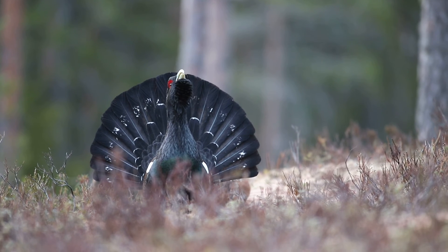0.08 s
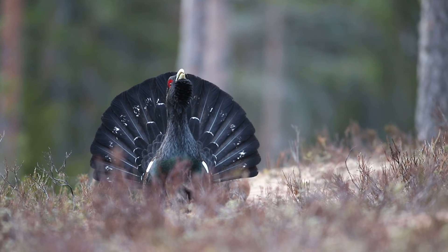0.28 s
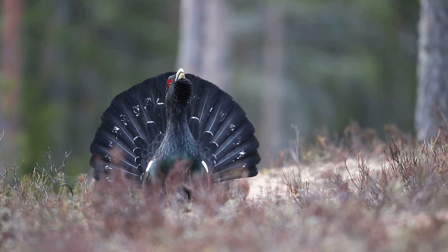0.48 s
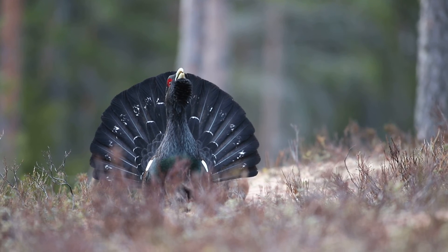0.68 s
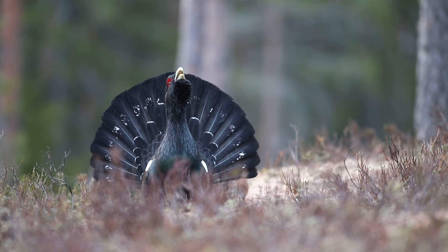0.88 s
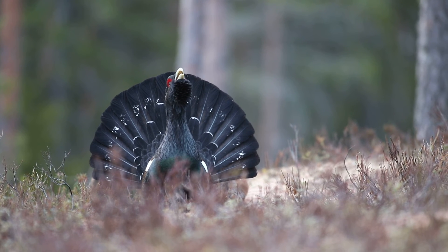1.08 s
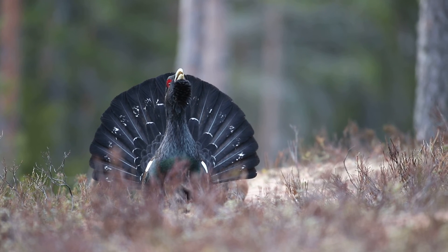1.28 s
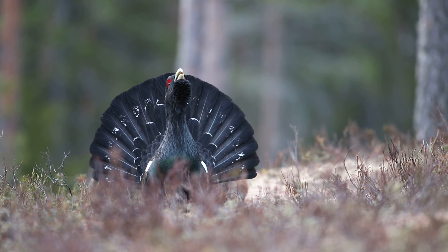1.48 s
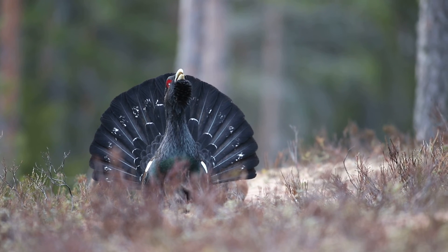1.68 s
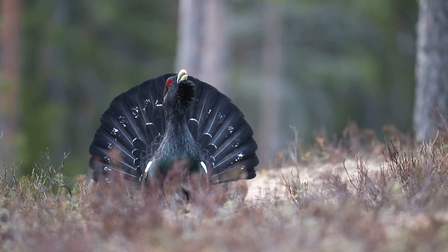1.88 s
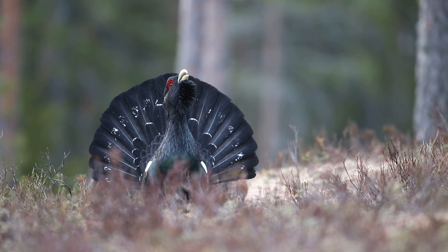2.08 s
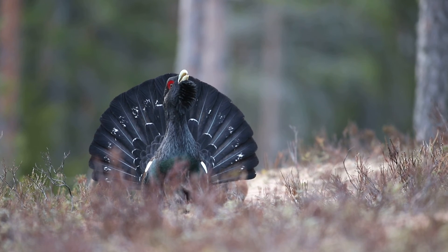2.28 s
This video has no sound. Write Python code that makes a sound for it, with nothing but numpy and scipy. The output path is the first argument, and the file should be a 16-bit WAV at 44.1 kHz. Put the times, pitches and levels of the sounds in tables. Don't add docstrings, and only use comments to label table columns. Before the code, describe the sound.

Near stereo view of a grouse in quiet pine woods: a low thump swells and fades, then two crisp hollow clicks snap, while distant birds whistle thinly with blurred echoes above soft air and rumble.

```python
import sys
import numpy as np
from scipy import signal
from scipy.fft import rfft, irfft, next_fast_len
from scipy.io import wavfile
from scipy.ndimage import uniform_filter1d, map_coordinates

SR = 44100
rng = np.random.default_rng(int(sys.argv[2]) if len(sys.argv) > 2 else 0)


def digitize_waveform(pressure):
    field = np.atleast_2d(pressure).T
    bounded = np.clip(field, -1, 1)
    quanta = np.round(bounded * 32767).astype(np.int16)
    wavfile.write(sys.argv[1], SR, quanta)


def invert_db(level):
    return 10 ** (np.asarray(level, dtype=float) / 20)


N = 101430
SONG_ECHO_T60_S = 0.4


def unit(x):
    return x / np.sqrt(np.mean(x ** 2) + 1e-20)


def along(points, hz):
    f, v = np.transpose(points)
    return np.interp(np.log(hz + 1), np.log(f + 1), v)


def curve(rows):
    return np.interp(np.arange(N) / SR, *np.transpose(rows))


def wobble(rate):
    return map_coordinates(rng.standard_normal(400), [np.arange(N) * rate / SR], mode="wrap")


def since(start_s):
    return np.clip(np.arange(N) / SR - start_s, 0, None)


def onset(t, rise_s):
    return 1 - np.exp(-(t / rise_s) ** 2)


def mode(t, hz, level_db, t60_s):
    return invert_db(level_db - 60 * t / t60_s) * np.sin(2 * np.pi * hz * t)


def filtered(x, response):
    m = next_fast_len(x.shape[-1] + 8192)
    return irfft(rfft(x, m) * response(np.fft.rfftfreq(m, 1 / SR)), m)[..., :x.shape[-1]]


def rush(spectrum, patchy_db):
    # pitch_hz [Hz], likeness [0 to 1]
    likeness = [(30, .999), (150, 0.99), (400, 0.95), (1000, 0.78), (4000, 0.6), (9000, 0.35), (15000, .35)]
    z = signal.stft(rng.standard_normal((2, N + 512)), nperseg=512)[2]
    field = uniform_filter1d(rng.standard_normal(z.shape[1:]), size=4, axis=0)
    field = uniform_filter1d(field, size=8, axis=1)
    pair = signal.istft(z * invert_db(patchy_db * unit(field)), nperseg=512)[1][:, :N]

    def mid_side(hz):
        angle = np.arccos(np.clip(along(likeness, hz), -1, 1)) / 2
        return invert_db(along(spectrum, hz)) * [np.cos(angle), np.sin(angle)]

    mid, side = filtered(pair, mid_side)
    return unit(np.array([mid + side, mid - side]))


def trunks(x, t60_s, gap_s):
    t = np.arange(SR) / SR
    tail = rng.standard_normal(SR) * invert_db(-60 * t / t60_s) * onset(t, gap_s)
    return signal.fftconvolve(x, tail / np.linalg.norm(tail))[:N]


def wood():
    # time_s [s], level_db [dB]
    rumble_level = [(0, -48.5), (.4, -49.5), (.6, -47), (.8, -53.5), (.95, -47.5), (1.1, -55), (1.35, -48),
                    (1.55, -51.5), (1.8, -51), (2, -52.5), (2.15, -51), (2.3, -51)]
    # pitch_hz [Hz], density_db [dB per Hz]
    rumble_band = [(20, -10), (42, -11), (65, 3.5), (80, -3.5), (97, -0.5), (120, -15.5), (145, -9),
                   (200, -47.5)]
    # pitch_hz [Hz], density_db [dB per Hz]
    air_band = [(120, -50), (190, 0), (330, -4.5), (600, -8), (1000, -19), (2000, -22), (5000, -29.5),
                (8000, -36)]
    drone_hz, drone_width_hz, drone_db = 158.6, 14.8, -61
    air_db = -62.5 + 0.5 * wobble(3.73)
    rumble = invert_db(curve(rumble_level)) * rush(rumble_band, patchy_db=-2.0)
    drone = filtered(rng.standard_normal(N), lambda hz: 1 / (1 + ((hz - drone_hz) / drone_width_hz) ** 2))
    air = invert_db(air_db) * rush(air_band, patchy_db=1.5)
    return rumble + invert_db(drone_db) * unit(drone) + air


def microphone_hiss():
    # pitch_hz [Hz], density_db [dB per Hz]
    hiss_band = [(200, -5), (2000, -1), (7000, -3.5), (15700, -5)]
    return invert_db(-66) * rush(hiss_band, patchy_db=0.3)


def sing(rows, glide, rise_s, edge_s, flutter_db, waver_hz):
    lead_s = .1
    out = np.zeros(N + SR)
    for start_s, length_s, from_hz, to_hz, level_db in rows:
        t = np.arange(round(length_s * SR)) / SR
        hz = from_hz + (to_hz - from_hz) * glide(t, length_s) + waver_hz * wobble(93.8)[:len(t)]
        edges = np.minimum(t / 0.0059, (length_s - t) / edge_s)
        swell = np.minimum(0.31 + t / rise_s, edges)
        shape = np.sin(np.pi / 2 * np.clip(swell, 0, 1))
        flutter = invert_db(flutter_db * wobble(75)[:len(t)])
        tone = np.sin(2 * np.pi * np.cumsum(hz) / SR)
        first = round((start_s + lead_s) * SR)
        out[first:first + len(t)] += invert_db(level_db - 1.5) * shape * flutter * tone
    return out[round(lead_s * SR):][:N]


def whistle(rows, settle_s, flutter_db, waver_hz):
    return sing(rows, lambda t, length_s: 1 - np.exp(-t / settle_s), .09, .018, flutter_db, waver_hz)


def songbirds():
    # start_s [s], length_s [s], start_hz [Hz], held_hz [Hz], level_db [dB]
    whistles = [(-.09, 0.13, 3500, 3295, -57), (.05, 0.081, 3313, 3310, -65.5),
                (.19, 0.093, 3290, 3280, -70), (.155, 0.14, 4460, 4420, -67), (.47, .15, 4270, 4260, -74),
                (.443, 0.14, 3500, 3393, -62), (.56, 0.13, 3386, 3343, -64.5), (.72, 0.11, 4420, 4405, -67),
                (.965, 0.13, 4240, 4170, -66.5), (1.04, 0.073, 3510, 3300, -57.5),
                (1.1, 0.047, 3350, 3320, -61), (1.155, 0.063, 3330, 3320, -56),
                (1.225, .09, 3330, 3320, -67.5), (1.31, 0.15, 4410, 4360, -68.5),
                (1.41, 0.057, 3930, 4170, -61.5), (1.465, 0.086, 4100, 4155, -60.5),
                (1.592, 0.045, 4150, 4160, -62.5), (1.46, 0.13, 4360, 4340, -72),
                (1.608, 0.17, 3440, 3286, -61), (1.77, .05, 3273, 3300, -61.5),
                (1.81, 0.077, 3300, 3280, -66), (1.875, 0.106, 4390, 4375, -64.5),
                (1.97, 0.11, 4370, 4360, -66.5), (2.09, 0.057, 4330, 4320, -74),
                (1.885, 0.09, 3930, 4140, -62), (1.97, 0.12, 4140, 4123, -64.5),
                (2.185, 0.16, 3320, 3310, -56), (2.2, .045, 3090, 3110, -64),
                (2.152, 0.056, 3520, 3334, -60)]
    # start_s [s], length_s [s], start_hz [Hz], end_hz [Hz], level_db [dB]
    chirps = [(.04, 0.022, 2620, 2660, -59.5), (.06, 0.012, 2760, 3100, -53), (.4, 0.04, 3490, 3430, -69),
              (.428, 0.021, 3430, 2840, -55.5), (.493, 0.014, 3170, 2650, -58),
              (.5, 0.022, 2650, 2840, -61), (.45, 0.022, 4560, 4800, -66), (.555, .02, 4050, 3750, -66),
              (.89, 0.026, 3050, 3070, -73), (.472, 0.019, 4000, 3750, -67), (.858, 0.033, 3730, 3620, -64),
              (.968, 0.024, 3600, 3800, -68), (1.312, 0.0296, 2860, 3780, -64),
              (1.33, 0.042, 3200, 3180, -66), (1.4, 0.022, 2910, 2930, -62.5),
              (1.54, 0.042, 2930, 2920, -72), (1.755, 0.0079, 2590, 2620, -58)]
    song = whistle(whistles, settle_s=.02, flutter_db=3.5, waver_hz=20)
    song = song + sing(chirps, lambda t, length_s: t / length_s, 0.018, 0.018, flutter_db=5, waver_hz=32)
    return song + invert_db(-6) * trunks(song, SONG_ECHO_T60_S, gap_s=0.011)


def farthest_chorus():
    # time_s [s], level_db [dB]
    chorus_level = [(0, -68.5), (.35, -74), (.5, -69), (.8, -72), (1.2, -70), (1.6, -74.5), (2.3, -98)]
    # pitch_hz [Hz], density_db [dB per Hz]
    chorus_band = [(2000, -28), (2500, -1.5), (3200, 7), (3700, -2.5), (5200, -25), (6000, -31)]
    return invert_db(curve(chorus_level)) * unit(rush(chorus_band, patchy_db=2.0).mean(axis=0))


def thump():
    # start_s [s], level_db [dB]
    pushes = [
        (.24, 0),
        (0.453, -30),
        (0.536, -27.5),
        (0.608, -40),
    ]
    # pitch_hz [Hz], level_db [dB], t60_s [s]
    resonances = [(89.8, 15.7, .047), (64.7, -3.3, .147), (360, -33, .05)]
    left_right_db = [[.15], [-.15]]
    out = np.zeros(N)
    for start_s, push_db in pushes:
        t = since(start_s)
        ring = sum((-1) ** k * mode(t, *row) for k, row in enumerate(resonances))
        out += invert_db(push_db) * onset(t, .027) * ring
    return out * invert_db(left_right_db)


def slide():
    # time_s [s], pitch_hz [Hz], level_db [dB]
    path = [
        (.643, 2560, -65),
        (0.667, 2850, -51.5),
        (0.699, 2910, -54),
        (0.721, 3090, -49.5),
        (.727, 3410, -65),
        (0.732, 3140, -48.5),
        (0.739, 2850, -69),
    ]
    time_s, pitch_hz, level_db = np.transpose(path)
    t = np.arange(N) / SR
    loudness = invert_db(np.interp(t, time_s, level_db, left=-150, right=-150))
    call = loudness * np.sin(2 * np.pi * np.cumsum(np.interp(t, time_s, pitch_hz)) / SR)
    return call + invert_db(-13) * trunks(call, SONG_ECHO_T60_S, gap_s=0.012)


def faint_whistler():
    # start_s [s], length_s [s], start_hz [Hz], held_hz [Hz], level_db [dB]
    far_notes = [(.66, 0.093, 4920, 4780, -72), (1.17, 0.1, 4900, 4740, -67.5),
                 (1.575, 0.14, 5030, 4720, -66), (1.645, 0.14, 4730, 4750, -68),
                 (1.12, 0.043, 4950, 4900, -67.5), (2.06, .08, 5060, 4950, -68),
                 (2.135, 0.14, 4780, 4680, -70)]
    return trunks(whistle(far_notes, settle_s=.05, flutter_db=4, waver_hz=60), .12, gap_s=0.0021)


def clicks():
    # start_s [s], rise_s [s]
    cracks = [
        (.94227, .00046),
        (1.09349, .0013),
    ]
    # pitch_hz [Hz], level_db [dB], t60_s [s], sign at the beak [+1 or -1]
    pipes = [
        [(838, -51, .07, -1), (1440, -42, .08, -1), (2113, -39, .056, 1), (2572, -35, .059, 1),
         (2996, -25, .019, -1), (3767, -33, .01, 1), (3952, -29, .013, 1), (4537, -43, .03, -1),
         (5201, -50, .033, -1), (5850, -34, .007, 1), (6321, -43, .008, -1), (8362, -52, .015, 1)],
        [(802, -61, .085, -1), (1390, -46, .006, -1), (2107, -38, .038, 1), (2365, -30, .013, -1),
         (2612, -11, .006, -1), (3035, -31, .025, 1), (3533, -32, .006, -1), (3881, -29, .006, -1),
         (4628, -45, .015, 1), (5348, -35, .006, -1), (6291, -56, .019, 1)],
    ]
    # pitch_hz [Hz], t60_s [s], level_db [dB]
    snaps = [
        [(257, 0.078, -39.5), (330.6, 0.097, -41.5), (3070, 0.19, -47.5), (4600, 0.093, -57),
         (9900, 0.009, -52), (12000, .005, -50)],
        [(319, 0.044, -38.5), (2485, 0.068, -46), (3100, .1, -64), (4540, 0.044, -59), (5120, .06, -56),
         (7300, 0.0041, -39), (9800, .006, -49)],
    ]
    # level_db [dB], lowest_hz [Hz]
    echoes = [
        (-13, 2330),
        (-11, 1800),
    ]
    # delay_s [s], level_db [dB]
    near_trunk = [
        (.043, -31),
        (.03, -24),
    ]
    shut_s, shut_t60_s, shut_low_hz, shut_high_hz = .016, .014, 2000, 2700
    chest_rise_s, scatter_t60_s = 0.0042, .025
    out = np.zeros(N)
    for crack, pipe, snap_modes, echo, trunk in zip(cracks, pipes, snaps, echoes, near_trunk):
        (start_s, rise_s), (echo_db, lowest_hz), (delay_s, trunk_db) = crack, echo, trunk
        t = since(start_s)
        choke = invert_db(-60 * np.clip(t - shut_s, 0, None) / shut_t60_s)
        body = np.zeros(N)
        for hz, level_db, t60_s, sign in pipe:
            ring = sign * mode(t, hz, level_db, t60_s)
            body += ring * choke if shut_low_hz < hz < shut_high_hz else ring
        for hz, t60_s, level_db in snap_modes:
            ring = mode(t, hz, level_db, t60_s)
            body += ring * onset(t, chest_rise_s) if hz < 500 else ring
        click = invert_db(1) * body * onset(t, rise_s)
        crack_only = click * invert_db(-60 * t / scatter_t60_s)
        far = filtered(crack_only, lambda hz: hz ** 6 / (hz ** 6 + lowest_hz ** 6))
        near = trunks(np.roll(click, round(delay_s * SR)), .08, gap_s=.006)
        out += click + invert_db(echo_db) * trunks(far, 0.37, gap_s=0.0062) + invert_db(trunk_db) * near
    return out


def scene():
    birds = songbirds() + farthest_chorus() + slide() + faint_whistler()
    return wood() + birds + thump() + clicks()


def band_limit(x):
    return signal.sosfilt(signal.butter(12, 16580, fs=SR, output="sos"), x)


def record(dry):
    top_hz = 15760
    mix = filtered(dry + microphone_hiss(), lambda hz: hz < top_hz)
    return band_limit(mix)


dry = scene()
out = record(dry)
digitize_waveform(out)
```